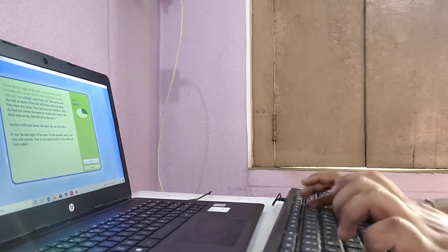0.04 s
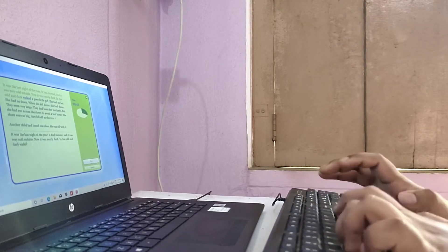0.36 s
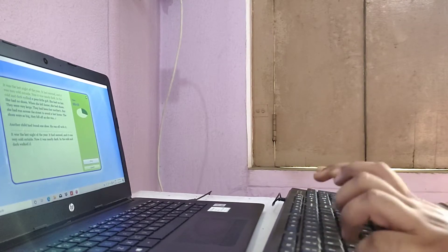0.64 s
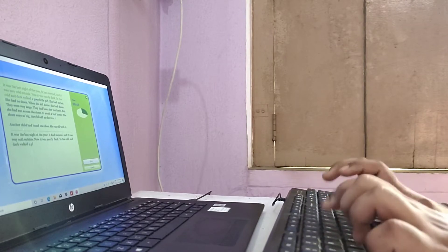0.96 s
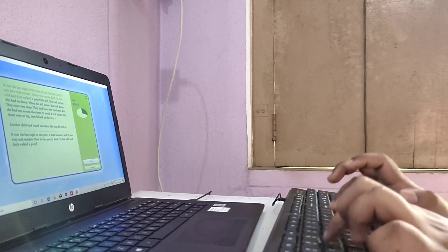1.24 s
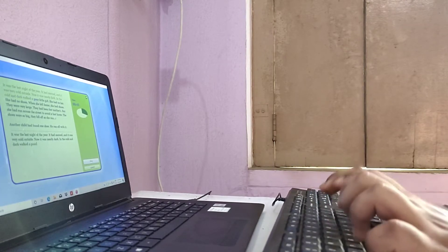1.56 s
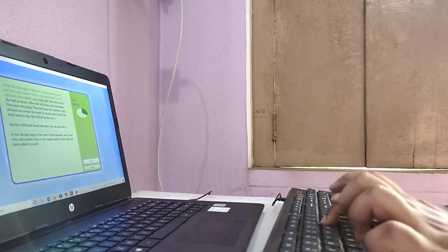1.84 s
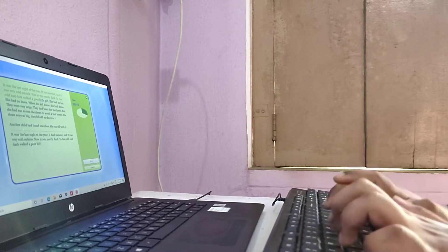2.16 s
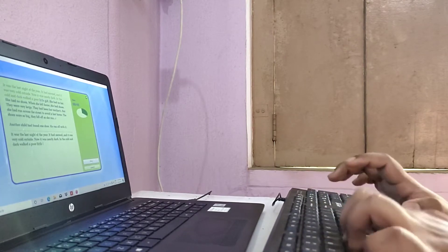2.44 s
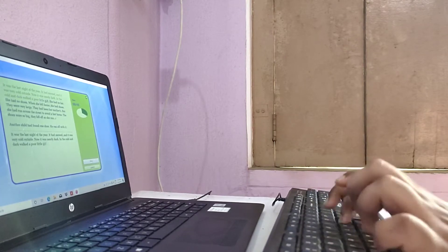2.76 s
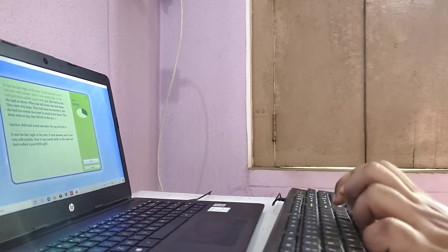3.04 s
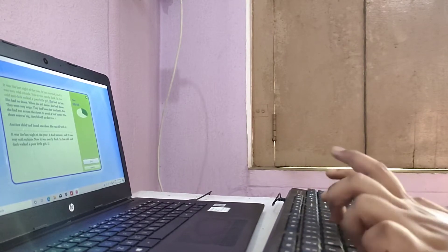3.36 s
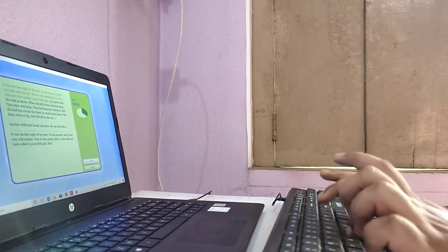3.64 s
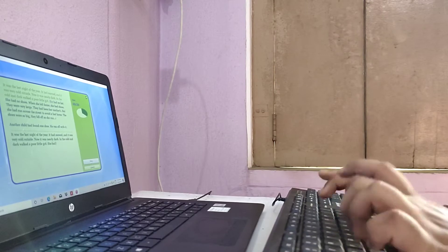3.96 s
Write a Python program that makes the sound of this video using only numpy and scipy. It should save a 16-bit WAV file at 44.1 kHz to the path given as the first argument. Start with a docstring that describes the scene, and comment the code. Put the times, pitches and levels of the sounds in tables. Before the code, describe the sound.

Fast typing on a plastic computer keyboard, keys clacking in a quiet room.

```python
"""Fast typing in a bare room

A plastic desktop keyboard, heard from a phone close by on the desk. Keycaps chatter as they bottom out
or snap back: a bright tick, a clack and a hollow knock of the case, now and then a clean snap or ping.
Firm presses bump the body and thump the desk; hard walls ring on for about a second over a quiet floor."""
import sys
import numpy as np
from scipy import signal
from scipy.fft import rfft, irfft
from scipy.io import wavfile

SR = 44100
rng = np.random.default_rng(int(sys.argv[2]) if len(sys.argv) > 2 else 0)


def generate_wav(signal):
    """Clip the signal to [-1, 1] and save it as 16-bit WAV at the path in sys.argv[1]."""
    frames = np.transpose(np.atleast_2d(signal))
    scaled = np.clip(frames, -1, 1) * 32767
    pcm = np.round(scaled).astype(np.int16)
    wavfile.write(sys.argv[1], SR, pcm)


N = 176400

# Finger blows that reach the desk. Each row: start in seconds, desk thump level in dB,
# body bump level in dB, bump pitch in Hz.
PRESSES = [(0.16, -47, -51, 216), (0.228, -54, -57, 228), (0.313, -41, -45.5, 178),
           (0.387, -50.5, -56, 181), (0.487, -41, -43.5, 179), (0.617, -44, -45, 212.6),
           (0.691, -41, -48, 244), (0.794, -44, -40.5, 217), (0.934, -53, -57, 250),
           (1.018, -55, -56.5, 177), (1.134, -53.5, -52.5, 159.6), (1.249, -47.5, -50, 188.7),
           (1.375, -55, -77, 219), (1.704, -44.5, -41.5, 200), (1.834, -43.5, -45, 176),
           (1.956, -44, -51.5, 162), (2.054, -50, -48.5, 177), (2.178, -49.5, -60, 210),
           (2.283, -42, -44.5, 238), (2.372, -49, -41.5, 196.4), (2.393, -42.5, -44.5, 222),
           (2.574, -46, -41, 187), (2.683, -42, -46, 222), (2.756, -37.5, -38.5, 180.4),
           (2.861, -50.5, -52, 245.5), (3.192, -47.5, -47.5, 220), (3.31, -42.5, -65, 163),
           (3.385, -66, -72, 247), (3.454, -44, -48, 191), (3.558, -39.5, -43, 172), (3.632, -49, -45, 207),
           (3.756, -44.5, -46.5, 208), (3.833, -45, -51.5, 167), (3.945, -42, -40, 195)]
PLACES = 5  # spots on the board, each with its own echoes; hits take them in turn
HIT_SAMPLES, LEAD_S = 5292, 0.012  # length of one impact; its run-up before the key lands
KEY_PAN_DB, DESK_PAN_DB = -1, -3  # left minus right
DIRECT_ALIKE_HZ, ROOM_ALIKE_HZ = 1970, 724  # below these both microphones hear much the same


def keys():
    """Each keycap impact is a hard tick, then a clack and a knock of the case; one track per place."""
    # Keycap impacts. Each row: start in seconds, chatter decay in seconds, then a level in dB (before
    # the trims below) and a resonance in Hz for the clack, for the tick and for the knock.
    impacts = [(0.1581, 0.0071, -41.5, 1910, -52, 6100, -43, 770),
               (0.227, 0.003, -32.5, 1730, -42, 6100, -38, 930),
               (0.3071, 0.0037, -39, 2330, -49.5, 6200, -69, 930),
               (0.3148, 0.003, -41, 2200, -55, 6600, -55, 557),
               (0.3857, 0.0045, -50, 2600, -60, 6200, -61.5, 510),
               (0.483, 0.016, -44, 1920, -50.5, 6360, -55.5, 714),
               (0.4975, 0.0011, -44, 2010, -61, 5900, -48, 387),
               (0.6105, 0.0068, -33, 1510, -39.5, 6800, -43.5, 1050),
               (0.6205, 0.0074, -39, 1500, -57, 6100, -43.5, 990),
               (0.689, 0.0045, -25, 2110, -35, 7200, -49, 1010),
               (0.697, 0.0043, -44, 2000, -46, 6600, -38.5, 1030),
               (0.7859, 0.0076, -31, 1610, -41.5, 7100, -47.5, 720),
               (0.7944, 0.0049, -45, 1780, -35.5, 6500, -41.5, 940),
               (0.8553, 0.0043, -27.5, 2310, -39, 5760, -40, 1130),
               (0.935, 0.006, -46, 2270, -61, 6200, -56, 1090),
               (1.0294, 0.0043, -51, 1840, -58.5, 6650, -55.5, 860),
               (1.122, 0.004, -44.5, 1930, -60, 6700, -56.5, 430),
               (1.131, 0.0018, -46, 1840, -53, 7900, -57, 402),
               (1.1895, 0.012, -48, 1930, -61, 4750, -69, 770),
               (1.2, 0.0035, -55, 1960, -60, 4800, -59, 800),
               (1.2434, 0.0039, -37, 2250, -47, 8450, -45.5, 900),
               (1.3694, 0.012, -50.5, 2355, -63, 5100, -60, 710),
               (1.603, 0.0039, -70.5, 2260, -92.5, 5000, -98, 420),
               (1.7001, 0.0028, -23.5, 2150, -28.5, 7950, -30, 1034),
               (1.7722, 0.0043, -24, 2420, -33.5, 5970, -38, 1030),
               (1.8335, 0.0041, -29, 1960, -35.5, 5900, -42, 1090),
               (1.9513, 0.0052, -41.5, 2490, -55, 6100, -47.5, 1110),
               (1.97, 0.026, -48, 1500, -54, 6000, -61.5, 1110),
               (2.0484, 0.0078, -40, 2770, -47.5, 7260, -50.5, 676),
               (2.1092, 0.0086, -49, 1730, -56.5, 6440, -57, 970),
               (2.1716, 0.0017, -39.5, 1840, -50, 6640, -56, 545),
               (2.2733, 0.018, -37, 3220, -53, 5550, -46.5, 1110),
               (2.2815, 0.0044, -32, 2000, -36, 5530, -40.5, 770),
               (2.3703, 0.0076, -27, 2450, -38, 5900, -43, 1070),
               (2.3917, 0.0011, -28.5, 2270, -32.5, 8400, -32.5, 1050),
               (2.4829, 0.0033, -27, 2100, -38, 6500, -40, 1000),
               (2.5715, 0.0021, -32.5, 2620, -44, 7650, -41, 890),
               (2.5861, 0.0044, -35.5, 2550, -48.5, 5800, -65, 1040),
               (2.643, 0.0062, -37, 2250, -50.5, 5800, -49.5, 950),
               (2.6795, 0.023, -40, 2440, -49.5, 4900, -49.5, 487),
               (2.7519, 0.0017, -33, 2900, -42.5, 6400, -38.5, 432),
               (2.7659, 0.00033, -35.5, 1900, -47.5, 6450, -73, 900),
               (2.8203, 0.0034, -42, 2150, -54, 5840, -48, 1070),
               (2.8613, 0.0037, -36.5, 2000, -46.5, 4900, -47, 1030),
               (2.9883, 0.0046, -49.5, 1980, -65, 4960, -81, 970),
               (3.07, 0.0029, -39, 2400, -48.5, 4870, -51.5, 650),
               (3.1855, 0.0043, -39.5, 2040, -45, 6030, -43, 616),
               (3.193, 0.016, -36.5, 2140, -44, 6440, -45, 680),
               (3.25, 0.0031, -46.5, 2140, -46, 7020, -52, 446),
               (3.273, 0.0024, -29.5, 1760, -35, 5300, -39.5, 960),
               (3.2853, 0.0017, -55, 2400, -53, 6000, -63, 900),
               (3.3139, 0.0042, -37.5, 1770, -48, 5200, -52, 755),
               (3.3512, 0.0027, -31, 2280, -40.5, 7300, -40, 1060),
               (3.3779, 0.0049, -32.5, 1580, -41, 6360, -37.5, 975),
               (3.4484, 0.016, -38.5, 1710, -50, 5130, -46.5, 935),
               (3.555, 0.0042, -31, 2300, -43, 6400, -55, 643),
               (3.623, 0.0058, -39.5, 1740, -42, 6540, -45, 645),
               (3.6297, 0.014, -39, 1910, -48, 6100, -49, 664),
               (3.7077, 0.011, -30, 2010, -40, 7340, -43, 1130),
               (3.7561, 0.01, -37.5, 2220, -49, 5900, -46, 770),
               (3.8289, 0.0037, -35, 1760, -42.5, 4700, -42.5, 950),
               (3.9428, 0.0079, -30.5, 2250, -40.5, 6100, -39.5, 597)]
    # Tone of the three parts of an impact. Each row: frequency in Hz, relative level in dB.
    clack_tone = [(300, -25), (700, -19), (1050, -9), (1500, -1), (2500, -1), (3100, 0.5), (3900, -5.5),
                  (5500, -29), (12000, -81.5)]
    tick_tone = [(1500, -9), (3300, -1.5), (4500, 0.5), (6100, 1), (8300, -2), (9300, -7), (11000, -19),
                 (13500, -17.5), (15500, -23.5)]
    knock_tone = [(100, -10.5), (230, -2.5), (310, -8.5), (380, -4), (500, -8.5), (780, -7.5), (1050, -7.5),
                  (1400, -2), (3000, -46)]
    # Shell resonances and a dip that all keys share. Each row: centre in Hz, width in Hz, lift in dB.
    shell_modes = [(575, 14, 3.5), (1014, 52, 4.5), (1560, 610, 1), (1947, 75, 3), (2550, 240, 3.5),
                   (3786, 350, -3.5), (6300, 150, 2.5), (8240, 830, 2)]
    hz = np.fft.rfftfreq(HIT_SAMPLES, 1 / SR)
    shell = sum(db / (1 + (2 * (hz - centre) / width) ** 2) for centre, width, db in shell_modes)
    clack_base, tick_base, knock_base = (
        curve(tone, hz) + shell for tone in (clack_tone, tick_tone, knock_tone))

    def lift(centre, db, octaves):
        """A resonant bell, in dB."""
        return db / (1 + (np.log2((hz + 1) / centre) / octaves) ** 2)

    out = np.zeros((PLACES, 2, N))
    for i, (at, decay, clack_db, clack_hz, tick_db, tick_hz, knock_db, knock_hz) in enumerate(impacts):
        tick_eq = tick_base + lift(tick_hz, db=4, octaves=0.25)
        clack_eq = clack_base + lift(clack_hz, db=9, octaves=0.19)
        clack_eq += lift(0.62 * clack_hz, db=5, octaves=0.27)  # the key's second, lower resonance
        knock_eq = knock_base + lift(knock_hz, db=7, octaves=0.18)
        tick = chatter(tick_eq, tick_db + 0.5, attack_s=0.00051, decay_s=decay)
        clack = chatter(clack_eq, clack_db - 1, attack_s=0.0009, decay_s=decay)
        knock = chatter(knock_eq, knock_db - 1, attack_s=0.0021, decay_s=2.02 * decay)
        place, start = out[i % PLACES], at - LEAD_S
        add(place, tick, start)
        add(place, (clack + knock) * pan(KEY_PAN_DB), start + 0.0004)  # just behind the tick
    return out


def chatter(eq_db, db, attack_s, decay_s):
    """A faint slide, a flurry of tiny plastic contacts that rings the shell, then three weak bounces."""
    t = np.arange(HIT_SAMPLES) / SR - LEAD_S
    after = np.maximum(t, 0)
    slide = undb(-17) * np.exp(-abs(t) / 0.002)
    shell_ring = undb(-19) * np.exp(-after / 0.029)
    blow = (1 - np.exp(-(after / attack_s) ** 2)) * (np.exp(-after / decay_s) + shell_ring)
    landings = np.cumsum(0.0092 * (0.5 + rng.random(3)))  # the loose cap rattles
    bounces = sum(undb(-19.5 - 15.5 * k) * (t > at) * np.exp(-abs(t - at) / 0.0025)
                  for k, at in enumerate(landings))
    contacts = rng.standard_normal((2, len(t)))
    contacts *= undb(7 * rng.standard_normal(len(t)))  # uneven strengths give the grain
    flurry = stereo_pair(contacts * (blow + slide + bounces), DIRECT_ALIKE_HZ)
    return level(colour(flurry, eq_db), db, length_s=0.01, start_s=LEAD_S)


def snaps():
    """A key that lands squarely rings its cap for a few clean cycles; one track per place."""
    # Square hits. Each row: start in seconds, pitch in Hz, peak level in dB, T60 in seconds.
    square_hits = [(0.2267, 943, -32, 0.015), (.484, 2000, -29.5, 0.0044), (0.6122, 1670, -28, 0.0065),
                   (.6135, 1280, -33.5, .016), (.6895, 2030, -20, 0.0055), (.6913, 2160, -17.5, 0.0028),
                   (.6925, 1413, -23, 0.011), (0.7868, 1660, -22, 0.004), (.8554, 2060, -15, 0.0023),
                   (.8578, 2140, -34.5, .01), (1.1315, 1750, -37, .006), (1.7726, 2420, -20, 0.0052),
                   (2.37, 2490, -22, 0.0045), (2.3747, 2450, -23, 0.013), (2.4836, 2020, -29, 0.0046),
                   (2.4864, 2200, -28, 0.0024), (2.5711, 2560, -27.5, 0.0061), (2.7518, 1940, -32, 0.0088),
                   (2.765, 1950, -32, .008), (3.0712, 1990, -28, 0.0083), (3.274, 2640, -20.5, 0.0075),
                   (3.3525, 1460, -28, .01), (3.3528, 1990, -20, 0.0022), (3.379, 1470, -22, 0.0042),
                   (3.3829, 1880, -23.5, 0.007), (3.5584, 2070, -30, 0.029), (3.7084, 2040, -27, 0.015),
                   (3.8298, 1850, -27, 0.011), (3.944, 2090, -16.5, 0.0055)]
    out = np.zeros((PLACES, 1, N))
    for i, (at, hz, db, t60) in enumerate(square_hits):
        mode = ring(hz, t60, swell_s=0.0016)
        add(out[i % PLACES], undb(db) * mode / abs(mode).max(), at)
    return out * pan(KEY_PAN_DB)


def pings():
    """A hard, glancing hit gives a keycap a short, high ring, aimed at the right microphone."""
    # Glancing hits. Each row: start in seconds, pitch in Hz, gain in dB.
    glancing_hits = [(.7862, 8250, -26), (1.7004, 8230, -8), (1.834, 6000, -18), (2.281, 5060, -24),
                     (2.392, 8400, -16)]
    out = np.zeros(N)
    for at, hz, db in glancing_hits:
        add(out, undb(db) * ring(hz, t60=0.0092, swell_s=0.000097), at)
    return out * undb([[-27.5], [0]])


def body_bumps():
    """The hollow keyboard bumps at a pitch that depends on where it is pressed."""
    # Modes of the body. Each row: ratio to the bump pitch, relative level in dB, T60 in seconds.
    body_modes = [(0.822, -1.5, 0.086), (1, 7, 0.057), (1.242, -11, 0.1)]
    out = np.zeros(N)
    for at, _, db, hz in PRESSES:
        bump = sum(undb(mode_db) * ring(hz * ratio, t60, swell_s=0.014)
                   for ratio, mode_db, t60 in body_modes)
        add(out, level(bump, db, length_s=0.04), at)
    return out * pan(DESK_PAN_DB)


def desk_thumps():
    """Presses ring the desk's low modes, which swell because a fingertip is soft."""
    # Modes of the desk. Each row: frequency in Hz, relative level in dB, T60 in seconds.
    desk_modes = [(104.1, -2.5, 0.59), (112.8, 7.5, 0.27), (131, 7.5, 0.099)]
    thump = sum(undb(db) * ring(hz, t60, swell_s=0.01) for hz, db, t60 in desk_modes)
    out = np.zeros(N)
    for at, db, _, _ in PRESSES:
        add(out, level(thump, db - 0.5, length_s=0.04), at)
    return out * pan(DESK_PAN_DB)


def room(x):
    """Early echoes from the screen and near walls, then a long tail that loses its treble first."""
    # Reverb bands. Each row: centre in Hz, level in dB, T60 in seconds.
    bands = [(80.4, -5, 3), (167, -6.5, 3.4), (322, 0.5, 0.53), (590, -2.5, 0.89), (1170, -6.5, 0.56),
             (2310, -8, 0.63), (4630, -5, 0.48), (8900, -6.5, 0.53), (16000, 2, 0.25)]
    t, hz = np.arange(SR) / SR, np.fft.rfftfreq(SR, 1 / SR)
    grain = np.log(undb(7.5)) * np.exp(-t / 0.1)  # the first echoes come one by one, then merge
    echoes = rng.standard_normal((2, SR)) * np.exp(grain * rng.standard_normal(SR) - grain ** 2)
    spectrum = rfft(stereo_pair(echoes, ROOM_ALIKE_HZ))
    early_lift = 1 + undb(-7.5) * np.exp(-t / 0.082)
    onset = 1 - np.exp(-(t / 0.0023) ** 2)
    log_centres = np.log([row[0] for row in bands])
    response = 0
    for share, (_, db, t60) in zip(np.eye(len(bands)), bands):
        band = irfft(spectrum * np.interp(np.log(hz + 1), log_centres, share), SR)
        envelope = fade(t, t60) * early_lift * onset
        response += undb(db) * band * envelope / np.sqrt(np.sum(envelope ** 2))
    return signal.fftconvolve(x, response, axes=1)[:, :N]


def opening_tail():
    """The room is still dying away from typing a moment earlier."""
    # Tone of the tail. Each row: frequency in Hz, relative level in dB.
    tail_tone = [(100, 6), (300, 4), (700, -5.5), (2200, -3.5), (4000, -19.5), (6500, -13), (7700, -13),
                 (9500, -34.5), (16000, -27)]
    return diffuse_noise(tail_tone, db=-63) * fade(np.arange(N) / SR, t60=1)


def room_tone():
    """The faint rumble and hiss of the quiet room."""
    # Tone of the still air. Each row: frequency in Hz, relative level in dB.
    air_tone = [(25, 12), (50, 4), (110, 0), (230, -3), (400, -14), (900, -27), (2300, -25), (3300, -34),
                (16000, -46)]
    return diffuse_noise(air_tone, db=-70.5)


def diffuse_noise(tone, db):
    """Steady coloured noise from all around, at an rms level."""
    noise = stereo_pair(rng.standard_normal((2, N)), ROOM_ALIKE_HZ)
    eq_db = curve(tone, np.fft.rfftfreq(N, 1 / SR))
    return level(colour(noise, eq_db), db, length_s=N / SR)


def ring(hz, t60, swell_s):
    """One struck mode that swells and dies away."""
    t = np.arange(SR // 2) / SR
    return np.sin(2 * np.pi * hz * t) * fade(t, t60) * (1 - np.exp(-t / swell_s))


def fade(t, t60):
    """A decay of 60 dB every t60 seconds."""
    return np.exp(-np.log(1000) * t / t60)


def undb(db):
    """Decibels to gain."""
    return 10 ** (np.asarray(db) / 20)


def curve(tone, hz):
    """An EQ curve in dB, drawn through its points on a log-frequency axis."""
    points_hz, points_db = np.transpose(tone)
    return np.interp(np.log(hz + 1), np.log(points_hz), points_db)


def colour(x, eq_db):
    """Minimum-phase EQ with one gain per frequency bin: nothing rings ahead of a hit."""
    n = x.shape[-1]
    cepstrum = irfft(np.log(undb(eq_db)), n)
    cepstrum[1:n // 2] *= 2
    cepstrum[n // 2 + 1:] = 0
    return irfft(rfft(x) * np.exp(rfft(cepstrum)), n)


def stereo_pair(x, alike_hz):
    """Two unrelated signals become a pair that is centred below a frequency and wide above it."""
    n = x.shape[-1]
    alike = 1 / (1 + (np.fft.rfftfreq(n, 1 / SR) / alike_hz) ** 2)
    mid, side = rfft(x) * np.sqrt([(1 + alike) / 2, (1 - alike) / 2])
    return irfft(np.array([mid + side, mid - side]), n)


def pan(db):
    """Left and right gains for a level difference."""
    return undb(np.array([[db], [-db]]) / 2)


def level(x, db, length_s, start_s=0):
    """Scale a sound so that one stretch of it has the given rms level."""
    stretch = x[..., int(start_s * SR):int((start_s + length_s) * SR)]
    return x * undb(db) / np.sqrt(np.mean(stretch ** 2))


def add(out, x, at):
    """Mix a sound in at a time in seconds."""
    i = max(int(at * SR), 0)
    out[..., i:i + x.shape[-1]] += x[..., :N - i]


def scene():
    """Keys, keyboard body and desk, heard directly and through the room."""
    places = keys() + snaps()
    cap_pings, bumps, thumps = pings(), body_bumps(), desk_thumps()
    left, right = places.sum(axis=0) + cap_pings + bumps + thumps
    right = np.interp(np.arange(N) - 4, np.arange(N), right)  # four samples later than the left
    send = undb(-18) * cap_pings + undb(-4) * bumps + undb(-8) * thumps
    echoes = sum(room(place) for place in places)
    echoes += room(np.tile(send.mean(axis=0), (2, 1)))
    return np.array([left, right]) + echoes + opening_tail() + room_tone()


def record(dry, low_cut_hz=75, top_hz=15600):
    """The phone thins the deep bass and cuts the top."""
    thin = signal.sosfilt(signal.butter(2, low_cut_hz, "high", fs=SR, output="sos"), dry)
    return signal.sosfilt(signal.ellip(8, 0.2, 70, top_hz, fs=SR, output="sos"), thin)


dry = scene()
out = record(dry)
generate_wav(out)
```